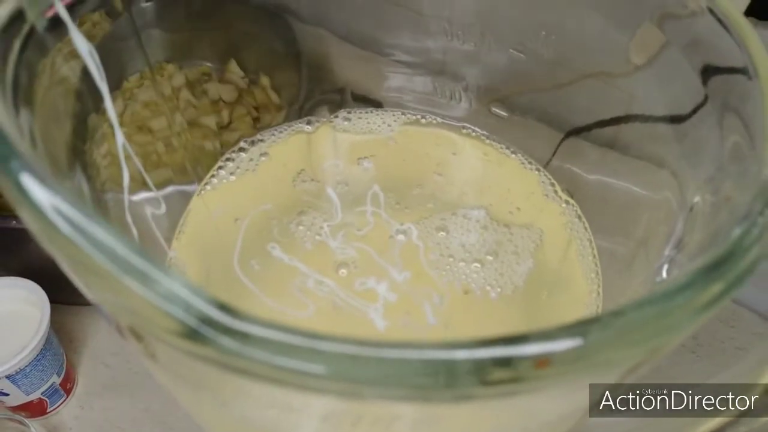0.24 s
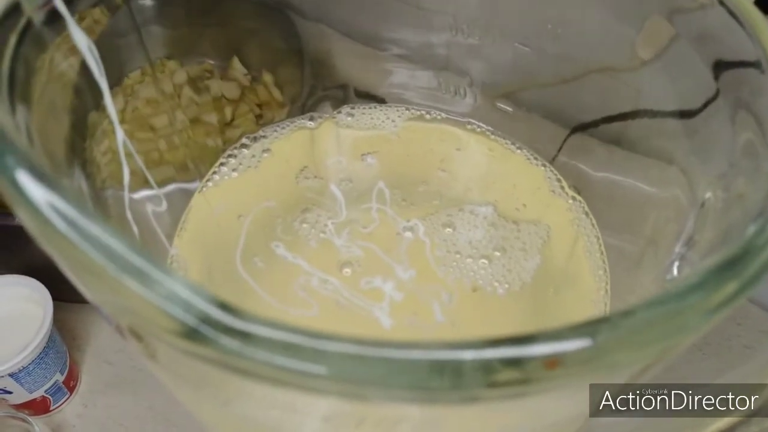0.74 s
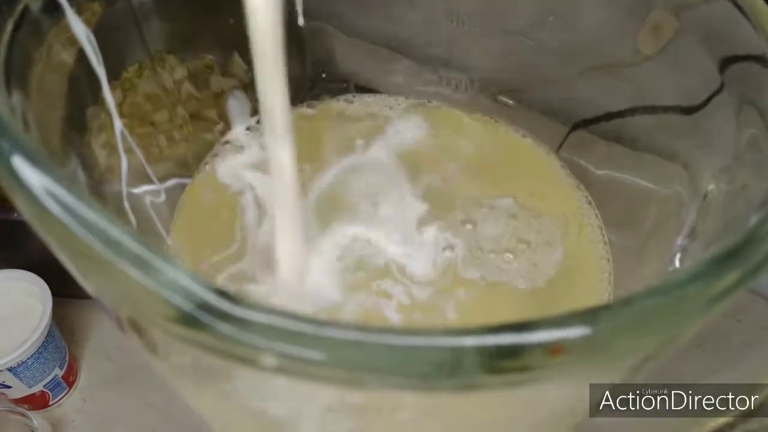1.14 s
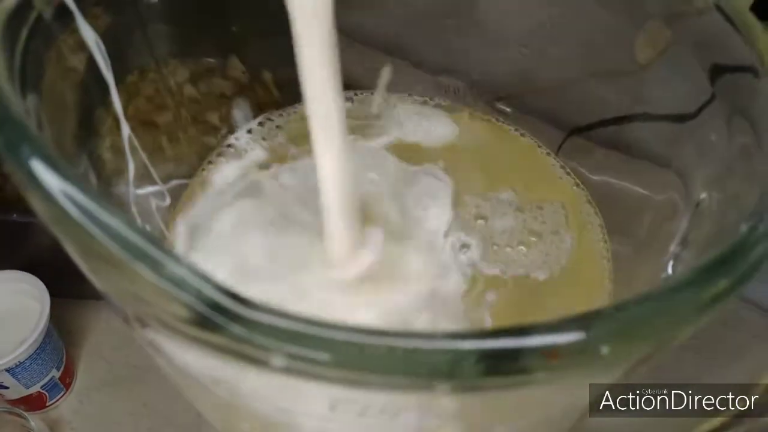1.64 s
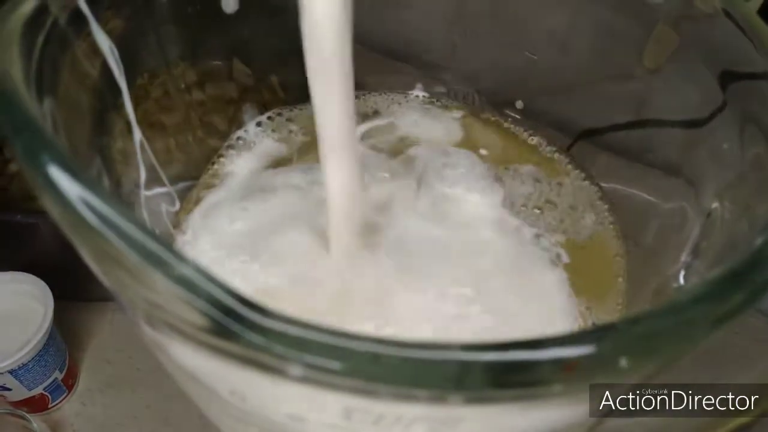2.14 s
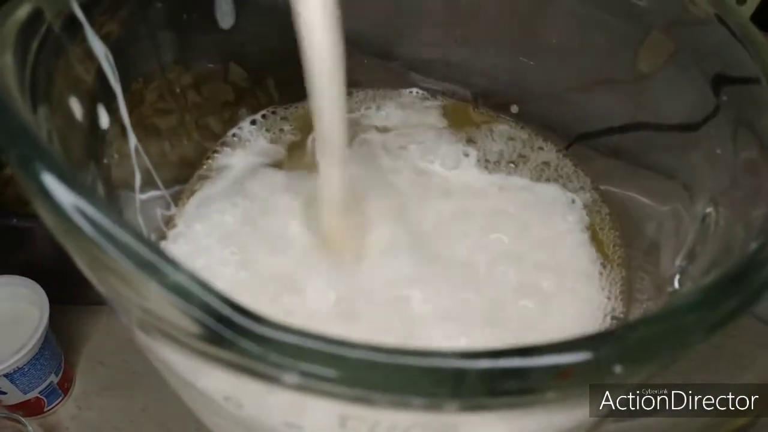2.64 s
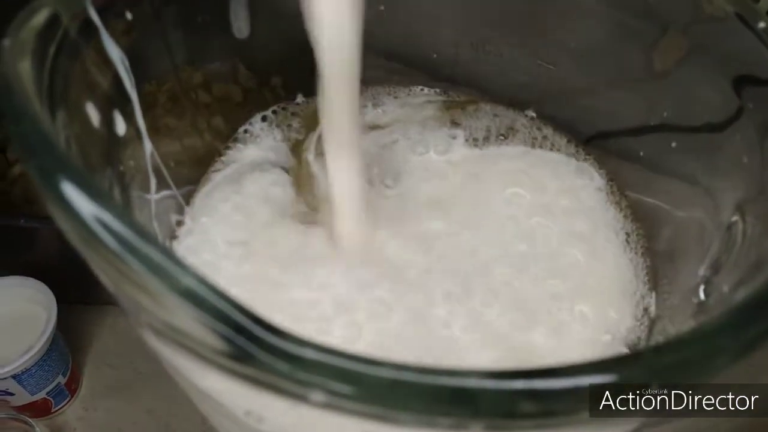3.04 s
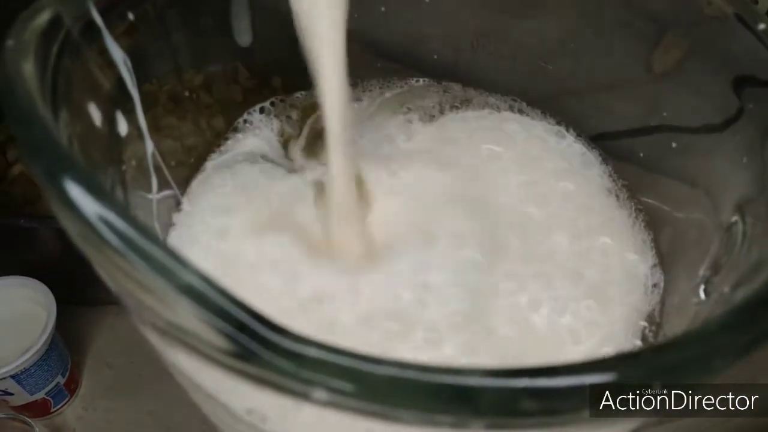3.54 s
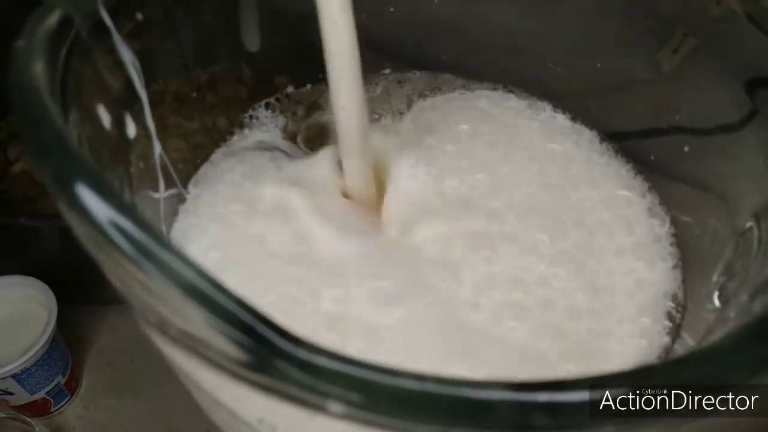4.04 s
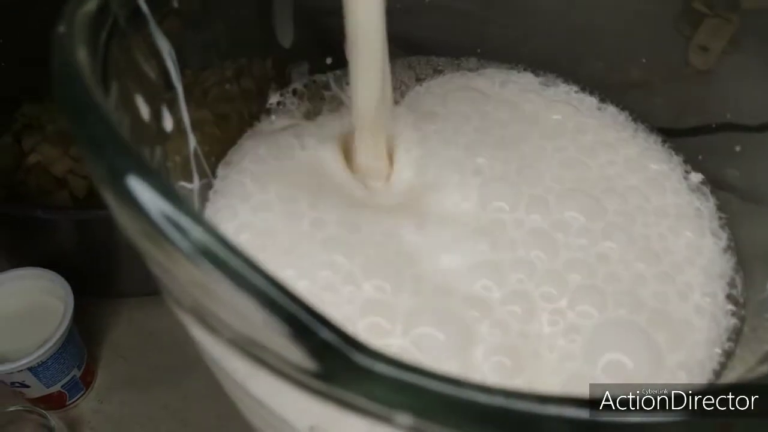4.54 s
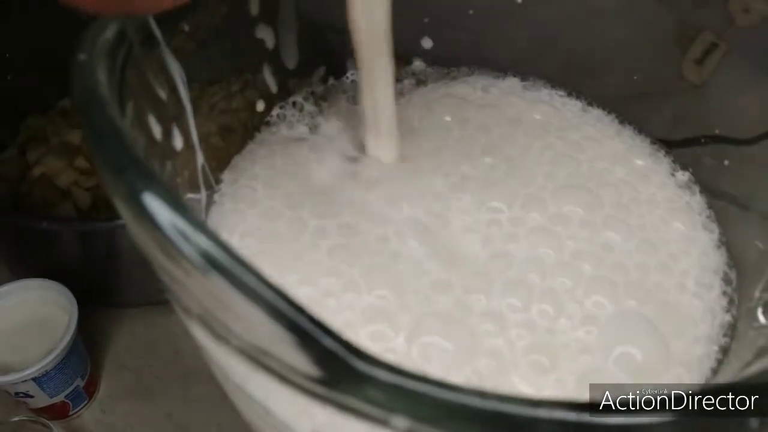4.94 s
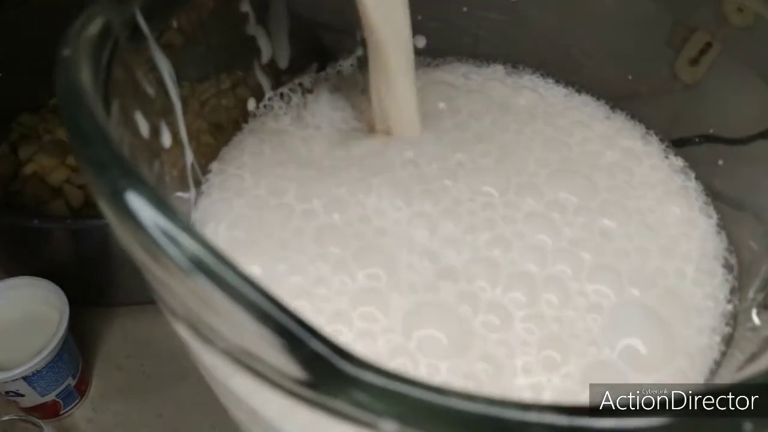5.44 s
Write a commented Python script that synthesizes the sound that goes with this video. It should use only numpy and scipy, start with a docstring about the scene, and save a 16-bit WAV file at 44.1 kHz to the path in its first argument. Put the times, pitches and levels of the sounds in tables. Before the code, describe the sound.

The first 0.9 seconds are nearly silent: faint kitchen noise and a very low rumble, with one quiet, short glass chime at about 0.5 seconds. At 0.9 to 1 second a stream of milk strikes liquid in a glass jar, and the rumble rises with it. Irregular splats follow, around fifteen a second, each with a crisp spray snap, wet splash and hollow knock of the jar's air. From 1.6 to 2 seconds deep gulps and bright bubble chirps stand out; between 2.2 and 4 seconds the slaps are sharpest, with hollow bloops near 2.5, soft low thumps and quick rising swoops. Froth fizzes and crackles in ragged surges, dipping briefly near 4.5 and flaring around 4.7. After 4.9 seconds the pour weakens into sparse, duller splats and small bubbles, nearly gone by 5.6. Pickup is close and stereo, with tight jar reflections and a faint kitchen tail.

```python
"""Over faint kitchen noise and a low rumble, a glass jar is touched and chimes once, as a sum of decaying modes.
Then milk is poured into the liquid in the jar, close to the microphones, and the rumble swells with it.
Its stream slaps the surface in quick splats: noise bursts that throw spray and knock the resonant air.
Trapped bubbles ring upward in pitch, froth churns and fizzes, heavy plunges thump and craters swoop shut.
The jar's walls answer at once and the kitchen faintly, as diffuse decaying reflections."""
import sys
import numpy as np
from scipy import signal
from scipy.fft import rfft, irfft, next_fast_len
from scipy.io import wavfile
from scipy.ndimage import uniform_filter1d, map_coordinates

SR = 44100
rng = np.random.default_rng(int(sys.argv[2]) if len(sys.argv) > 2 else 0)


def waveform_to_disk(signal):
    """Save audio, clipped to [-1, 1], as 16-bit WAV at the path in sys.argv[1]."""
    frames = np.transpose(np.atleast_2d(signal))
    scaled = np.clip(frames, -1, 1) * 32767
    samples = np.round(scaled).astype(np.int16)
    wavfile.write(sys.argv[1], SR, samples)


N = 250047
TOP_HZ = 16400  # upper limit of the audible band here

# Spectrum of spray and foam: (frequency [Hz], relative level [dB])
SPRAY_SPECTRUM = [(300, -44), (1000, 11.5), (1700, 5), (2300, -9), (3100, 6), (3400, 10.5), (3680, 16),
                  (3900, 2), (4200, 10.5), (5200, -1), (7200, 6.5), (9500, -2), (11500, 7), (15000, -10.5),
                  (16300, -40.5)]
# Main slaps of the stream on the surface:
# (time [s], relative treble snap [dB], relative knock of the air [dB], relative splash [dB])
STREAM_SLAPS = [(0.9101, -43.5, -61, -70), (0.9869, -16, -32.5, -29.5), (1.084, -25, -23.5, -33.5),
                (1.175, -49, -47, -40.5), (1.2136, -29, -31, -35.5), (1.236, -35, -35, -44),
                (1.2678, -45, -56, -34.5), (1.2921, -36.5, -56, -33), (1.3558, -37, -27.5, -39.5),
                (1.456, -17.5, -35.5, -29), (1.5, -52, -32, -32), (1.546, -27.5, -49, -45.5),
                (1.5976, -29, -24.5, -39), (1.6503, -16, -24.5, -31), (1.698, -20, -26.5, -41),
                (1.7823, -31, -26, -37.5), (1.8214, -29, -21, -39.5), (1.8926, -29.5, -20.5, -23),
                (1.968, -28.5, -45, -38.5), (2.0446, -25, -32.5, -38), (2.113, -42, -37.5, -41),
                (2.1441, -25, -56, -32.5), (2.1965, -12.5, -30, -36), (2.286, -31, -31, -33.5),
                (2.369, -29, -24.5, -30), (2.4612, -28.5, -26.5, -34.5), (2.5063, -40, -21.5, -25.5),
                (2.6253, -28, -33, -35), (2.715, -8, -32, -24.5), (2.7511, -25, -58, -32.5),
                (2.7836, -15.5, -23.5, -34.5), (2.8265, -34, -22.5, -45), (2.8619, -33, -36, -32.5),
                (2.9225, -16, -45, -34.5), (2.9606, -29, -31.5, -32), (3.0001, -44, -26.5, -44),
                (3.041, -24, -30.5, -30.5), (3.174, -48.5, -32, -54.5), (3.2239, -13.5, -55, -27.5),
                (3.268, -15, -32.5, -25), (3.3459, -11, -41, -32.5), (3.3945, -25.5, -33.5, -30.5),
                (3.467, -39, -27, -45), (3.4927, -30, -52, -38), (3.5203, -13.5, -20.5, -28),
                (3.5959, -26.5, -42, -37.5), (3.6523, -26.5, -39, -37.5), (3.6782, -42, -31.5, -42),
                (3.7212, -41, -34.5, -50), (3.7716, -17.5, -36, -31.5), (3.846, -31, -45, -49.5),
                (3.9001, -19.5, -27.5, -31), (3.9692, -25, -54, -41), (4.0447, -21.5, -29.5, -41),
                (4.1068, -26.5, -26.5, -45.5), (4.1413, -25, -30, -42), (4.1658, -32.5, -29.5, -49),
                (4.3011, -21, -25.5, -48), (4.3419, -31.5, -28, -50.5), (4.405, -27.5, -32.5, -32),
                (4.4383, -42, -27.5, -39.5), (4.533, -48, -38.5, -57.5), (4.603, -25, -22, -36.5),
                (4.643, -30.5, -50, -45), (4.6847, -25, -20, -45), (4.7404, -30, -58, -41),
                (4.8038, -31.5, -44.5, -33), (4.8265, -27.5, -36.5, -48.5), (4.8825, -35.5, -48, -42.5),
                (4.9722, -29, -25.5, -41.5), (5.0121, -29.5, -39.5, -54), (5.1334, -41, -34.5, -56),
                (5.2107, -37, -29, -52.5), (5.227, -45, -35, -54.5), (5.2846, -45, -36, -65),
                (5.302, -60, -41, -42.5), (5.3877, -38, -35.5, -54), (5.4134, -31.5, -41.5, -51.5),
                (5.5354, -78, -37.5, -59.5)]


def amp(db):
    """Convert decibels to a pressure ratio, 20 dB to each factor of ten."""
    return 10 ** (np.asarray(db) / 20)


def unit(x):
    """Normalise the signal power: scale to rms 1."""
    return x / np.sqrt(np.mean(x ** 2) + 1e-20)


def along(points, hz):
    """Interpolate (Hz, value) points on a logarithmic frequency axis."""
    f, v = np.transpose(points)
    return np.interp(np.log(hz + 1), np.log(f + 1), v)


def curves(rows):
    """Interpolate each column after the time linearly, one value per sample."""
    s, *cols = np.transpose(rows)
    return [np.interp(np.arange(N) / SR, s, c) for c in cols]


def seconds(length):
    """Sample a time axis [s] uniformly."""
    return np.arange(int(length * SR)) / SR


def add(track, s, sound):
    """Superpose a sound on a track, starting at time s."""
    part = track[..., max(0, round(s * SR)):][..., :sound.shape[-1]]
    part += sound[..., :part.shape[-1]]


def filtered(x, response):
    """Linear filtering: multiply the spectrum of x by a response of frequency."""
    n = x.shape[-1]
    m = next_fast_len(n + 4096)  # padding keeps the filter's ringing from wrapping round
    return irfft(rfft(x, m) * response(np.fft.rfftfreq(m, 1 / SR)), m)[..., :n]


def noise(colour, channels=1):
    """Spectral shaping of white noise into coloured noise of rms 1."""
    white = rng.standard_normal((channels, N))
    return unit(filtered(white, lambda hz: amp(along(colour, hz))))


def wobble(rate):
    """Slow random modulation: a smooth spline through `rate` random knots a second."""
    knots = rng.standard_normal(int(N * rate / SR) + 4)
    return map_coordinates(knots, [np.arange(N) * rate / SR])


def rumble(level_db=-2, side_db=-20, room_db=-57, lump_db=1.5):
    """Low-frequency noise, nearly alike at both ports, grows with the pour over the quiet kitchen."""
    # Course of the rumble: (time [s], relative level [dB])
    rumble_course = [(0.0, -45), (0.82, -49), (.92, -39), (4.01, -37.5), (4.11, -38.5), (4.37, -35.5),
                     (5.15, -43), (5.42, -39), (5.48, -47), (5.67, -54)]
    # Spectrum of the rumble: (frequency [Hz], relative level [dB])
    rumble_spectrum = [(12, -41.5), (20, 3.5), (31, -4), (42, 8), (52, -7.5), (68, 8), (97, -7),
                       (125, -3.5), (144, -11.5), (167, -34.5), (200, -26), (260, -25), (440, -120)]
    # Spectrum of the quiet kitchen: (frequency [Hz], relative level [dB])
    room_spectrum = [(20, 9), (70, 2), (150, -16.5), (300, -10), (600, -23.5), (1200, -30.5), (3000, -38.5),
                     (15000, -47)]
    in_phase = noise(rumble_spectrum)
    opposed = noise(rumble_spectrum) * [[1], [-1]]
    low = in_phase + amp(side_db) * opposed
    low = unit(low * amp(lump_db * wobble(17)))  # it comes in uneven lumps
    return amp(curves(rumble_course)[0] + level_db) * low + amp(room_db) * noise(room_spectrum)


def chime(s=.479, level_db=-2, ring_attack=0.0023, tap_db=-52, tap_life=0.065, tap_hz=860, tap_width_hz=300):
    """Modal vibration: a light tap, itself resonant noise, sets the glass ringing in decaying sines."""
    # Modes of the glass: (frequency [Hz], relative level [dB], time to fall 60 dB [s])
    glass_modes = [(818, -39, 0.078), (860, -46.5, 0.28), (1111, -47.5, 1.11), (1196, -49.5, 0.39),
                   (2794, -41.5, 0.25), (3340, -53, 0.1), (4820, -59, 0.091)]
    t, out = seconds(0.59), np.zeros(N)
    ring = sum(amp(db - 60 * t / t60) * np.sin(2 * np.pi * hz * t) for hz, db, t60 in glass_modes)
    ring = ring * (1 - np.exp(-t / ring_attack))

    def tap_response(hz):
        """A single damped resonance followed by a first-order loss of treble."""
        resonance = 1j * hz / (tap_hz ** 2 - hz ** 2 + 1j * tap_width_hz * hz)
        return resonance / (1 + 1j * hz / 3000)

    tap = unit(filtered(rng.standard_normal(len(t)), tap_response))
    add(out, s, amp(level_db) * ring + amp(tap_db) * tap * np.exp(-t / tap_life))
    return out


def echoes(x, t60, low_hz):
    """Diffuse reflection: exponential noise tails, independent at the two ports and weak below low_hz."""
    t, out, size = seconds(.4), np.zeros((2, N)), SR // 4
    for start in range(0, N, size):  # a new tail each quarter second, as the liquid moves
        tail = rng.standard_normal((2, len(t))) * amp(-60 * t / t60) * (1 - np.exp(-t / 0.00035))
        tail = filtered(tail / np.linalg.norm(tail[0]), lambda hz: (1j * hz / (low_hz + 1j * hz)) ** 2)
        add(out, start / SR, signal.fftconvolve(x[:, start:start + size], tail, axes=1))
    return out


def cavity(hz):
    """Cavity resonance: the damped modes of the air above the liquid, summed."""
    # Modes of the air in the jar: (frequency [Hz], bandwidth [Hz], relative level [dB])
    air_modes = [(419.7, 23.2, 31.5), (533, 150, 16.5), (730, 57.5, 25), (916, 40, 22.5)]
    return sum(amp(db) * 1j * hz * w / (c * c - hz * hz + 1j * hz * w) for c, w, db in air_modes)


def slap(t, snap_db, knock_db, splash_db, split_hz=6000, snap_life=0.0009, splash_life=0.0014,
         burst_db=3.0, spray_db=-14, spray_life=0.00071, mist_db=-33, mist_life=0.038,
         attack=0.00019, attack_spread=0.31, vary_db=4.0, sputter_db=3.5, width=0.76):
    """Impact on a liquid: a bright snap and duller splash of noise, with one impulse to the air in the jar."""
    # each slap bursts a pocket of its own shape, hence its own spectrum
    pocket = np.c_[np.geomspace(1000, 16000, 20), rng.normal(0, vary_db, 20)]
    # noise common to both ports, plus some of each port's own
    grit = rng.standard_normal(len(t)) + width * rng.standard_normal((2, len(t)))
    # a sputtering tail of spray and fine mist
    sputter = np.interp(t, np.linspace(0, t[-1], 70), rng.normal(0, sputter_db, 70))
    tail = amp(spray_db) * np.exp(-t / spray_life) + amp(mist_db) * np.exp(-t / mist_life)
    spray = amp(sputter) * tail
    softness = np.exp(attack_spread * rng.standard_normal())  # some slaps land flat, others tear open
    onset = (1 - np.exp(-t / (attack * softness))) ** 2

    def colour(hz):
        """Spectrum of the spray, modified by this pocket."""
        return amp(along(SPRAY_SPECTRUM, hz) + along(pocket, hz))

    def treble(hz):
        """Crossover: the share of the spectrum above the split."""
        return hz ** 6 / (hz ** 6 + split_hz ** 6)

    def burst(share, life):
        """Energy scaling: a band of grit is set to the rms of its short envelope."""
        envelope = (amp(burst_db) * np.exp(-t / life) + spray) * onset
        sound = filtered(grit, lambda hz: colour(hz) * share(hz)) * envelope
        return unit(sound) * np.sqrt(np.mean(envelope ** 2))

    knock = filtered(np.exp(-t / .0001), cavity)
    # sloshing shifts the cavity's pitch
    knock = np.interp(t * np.exp(rng.normal(0, 0.061)), t, knock / np.abs(knock).max())
    snap = burst(treble, snap_life)
    splash = burst(lambda hz: 1 - treble(hz), splash_life * softness)
    return amp(snap_db) * snap + amp(splash_db) * splash + amp(knock_db) * knock


def splats(snap_db=-5, knock_db=4.0, splash_db=3.0, delay=.0006):
    """Repeated impact: the main slaps of the stream on the surface, superposed."""
    t, out = seconds(.09), np.zeros((2, N))
    for s, snap, knock, splash in STREAM_SLAPS:
        add(out, s + delay, slap(t, snap + snap_db, knock + knock_db, splash + splash_db))
    return out


def swoop(start_hz, end_hz, length, flutter=0.56, size=22):
    """Shrinking resonator: a hollow's period falls linearly, so its pitch climbs ever faster."""
    u = seconds(length) / length
    hz = 1 / ((1 - u) / start_hz + u / end_hz)
    # the falling milk drives it unevenly, in strength and phase
    knots = rng.standard_normal(size) + 1j * rng.standard_normal(size)
    drive = 1 + flutter * np.interp(u, np.linspace(0, 1, size), knots)
    envelope = np.sqrt(np.sin(np.pi * u) * start_hz / hz)
    return envelope * np.imag(drive * np.exp(2j * np.pi * np.cumsum(hz) / SR))


def trapped(level_db=-13, centre_hz=620, spread=0.25, climb=1.6, length=.065, fade=0.041):
    """Entrained air: each slap traps a lesser pocket that glides up, louder for a harder knock."""
    out = np.zeros(N)
    variations = np.exp(spread * rng.standard_normal((len(STREAM_SLAPS), 2)))
    for (s, _, knock, _), (size, pace) in zip(STREAM_SLAPS, variations):
        glide = swoop(centre_hz * size, centre_hz * size * climb, length * pace)
        add(out, s, amp(knock + level_db) * glide * np.exp(-seconds(length * pace) / fade))
    return out


def lifetime(hz):
    """Bubble damping: the decay time [s] shortens as a power of pitch, from 5.2 ms at 1 kHz."""
    return 0.0052 * (hz / 1000) ** -0.92


def bubble(t, hz, life, rise, rough=0.034):
    """Bubble resonance: it swells, rings and sharpens as it nears the surface."""
    # the churning milk jostles its pitch
    jostle = np.interp(t, np.linspace(0, t[-1], 60), rng.standard_normal(60))
    phase = 2 * np.pi * np.cumsum(hz * (1 + rise * t + rough * jostle)) / SR
    return (1 - np.exp(-2 * t / life)) * np.exp(-t / life) * np.sin(phase)


def crackle(level_db=-5, count=42, centre_hz=3600, spread=0.72, wait=.024, fade_db=6.5, vary_db=4, rise=15):
    """Random arrival: every splash leaves a shower of tiny bubbles, which thins out and fades."""
    t, out = seconds(.015), np.zeros((2, N))
    for s, _, _, splash in STREAM_SLAPS:
        lateness = rng.exponential(size=count)  # in units of the mean wait [s]
        for late, (size, strength, place) in zip(lateness, rng.standard_normal((count, 3))):
            hz = min(centre_hz * np.exp(spread * size), TOP_HZ)
            level = splash + level_db - fade_db * late + vary_db * strength
            ring = amp(level) * bubble(t, hz, lifetime(hz) / 2, rise)
            add(out, s + wait * late, ring * (1 + 0.26 * place * np.array([[1], [-1]])))
    return out


def swarm(count, centre_hz, spread, cycles, rise):
    """Incoherent superposition: many short-lived bubbles of random size and strength, rms 1."""
    t, out = seconds(min(.04, 40 / centre_hz)), np.zeros(N)
    for when, size, strength, speed in rng.random((count, 4)):
        hz = centre_hz * 2 ** (spread * (2 * size - 1))  # spread in octaves either way
        life = cycles / hz * (.5 + speed)
        add(out, when * N / SR, amp(20 * strength ** 2) * bubble(t, hz, life, rise * speed / life))
    return unit(out)


def droplets(count, life):
    """Impulsive noise: stray droplets tick on the foam and the glass in decaying bursts, rms 1."""
    hits = np.zeros(N)
    hits[rng.integers(0, N, count)] = amp(20 * rng.random(count) ** 2)
    envelope = signal.lfilter([1], [1, -np.exp(-1 / (life * SR))], hits)
    return unit(envelope * noise(SPRAY_SPECTRUM)[0])


def slap_envelope(settle, base, dip_s=0.016, dip_db=-8):
    """Amplitude modulation: the level dips briefly before each slap, jumps at it and settles."""
    t, jumps, dip = seconds(.3), np.zeros(N), np.zeros(N)
    for s, _, _, splash in STREAM_SLAPS:
        add(jumps, s, amp(splash / 2) * np.exp(-t / settle))
        add(dip, s - dip_s, seconds(dip_s) / dip_s)
    return (base + (1 - base) * unit(jumps)) * amp(dip_db * dip)


def froth(churn_db=-7, hollow_db=-4, gulp_db=-5, small_db=-3, fizz_db=-13, tiny_db=-4, tick_db=-7, surge_db=3.0):
    """Turbulent aeration: the milk churns and gulps, small bubbles blip and foam fizzes in ragged surges."""
    # Course of the pour: (time [s], relative churn level [dB], relative fizz level [dB])
    pour_course = [(0.9, -73, -62), (0.98, -60.5, -53), (1.09, -47, -58), (1.16, -45.5, -57),
                   (1.47, -45.5, -48.5), (1.76, -38, -56), (2.31, -48.5, -53), (2.53, -41.5, -54),
                   (2.8, -45.5, -52.5), (3.1, -47, -57), (3.54, -43, -56.5), (3.92, -48, -54.5),
                   (4.44, -47.5, -49.5), (4.53, -61, -73), (4.68, -47.5, -43.5), (4.87, -46.5, -62),
                   (5.56, -68.5, -96), (5.67, -57, -104)]
    # Spectrum of the churning: (frequency [Hz], relative level [dB])
    churn_spectrum = [(120, -7.5), (250, 6), (410, 8.5), (550, -17), (740, -2), (1100, -10.5),
                      (1700, -36.5), (3000, -38.5), (6000, -55)]
    churn_level, fizz_level = curves(pour_course)
    start_s, rise_s = 0.93, 0.015  # the stream arrives and reaches full flow
    flow = np.clip((np.arange(N) / SR - start_s) / rise_s, 0, 1)

    gulps = swarm(count=300, centre_hz=561.4, spread=0.75, cycles=4.83, rise=0.061)
    blips = swarm(count=600, centre_hz=1180, spread=0.773, cycles=5.3, rise=0.14)
    beads = swarm(count=2600, centre_hz=3022, spread=0.814, cycles=3.5, rise=0.065)
    ticks = droplets(count=260, life=0.00068)
    hollow = unit(filtered(rng.standard_normal(N), cavity))  # the churning keeps the air in the jar sounding

    body = amp(churn_db) * noise(churn_spectrum) + amp(hollow_db) * hollow
    body = body + amp(gulp_db) * gulps + amp(small_db) * blips
    foam = amp(fizz_db) * noise(SPRAY_SPECTRUM, channels=2) + amp(tiny_db) * beads + amp(tick_db) * ticks
    body = amp(churn_level) * slap_envelope(settle=0.0087, base=0.73) * body
    surging = amp(fizz_level + surge_db * wobble(24.68))
    foam = surging * slap_envelope(settle=0.014, base=0.72) * foam
    return flow * (body + foam)


def gurgles(level_db=0, rise=6.5):
    """Bubble resonance: loud single bubbles dragged under by the stream; small ones climb faster in pitch."""
    # The loudest single bubbles: (time [s], starting pitch [Hz], relative level [dB])
    loud_bubbles = [(0.953, 3180, -33), (.959, 1820, -33), (0.986, 600, -23.5), (1.175, 4200, -26),
                    (1.178, 967, -25), (1.352, 1147, -23), (1.39, 4180, -21.5), (1.595, 286, -19.5),
                    (1.649, 295, -21), (1.7, 282, -21.5), (1.739, 693, -24), (1.785, 343, -17.5),
                    (1.804, 3510, -12), (1.807, 2610, -14), (1.817, 395, -15), (1.838, 455, -21.5),
                    (1.89, 443, -24.5), (1.905, 553, -23.5), (2.344, 3600, -21), (2.407, 797, -24),
                    (2.508, 692, -11.5), (2.559, 726, -15), (2.691, 3060, -23.5), (2.791, 699, -17),
                    (2.803, 740, -19.5), (2.972, 3680, -23), (3.217, 1410, -28.5), (3.239, 3170, -14.5),
                    (3.365, 1670, -30), (3.394, 1336, -16.5), (3.495, 2750, -25), (3.68, 4800, -22),
                    (4.079, 2994, -18.5), (4.136, 524, -26), (4.309, 772, -25.5), (4.373, 723, -24),
                    (4.388, 2800, -20), (4.407, 1160, -21.5), (4.438, 927, -18), (4.609, 425, -23),
                    (4.692, 394, -19.5), (4.74, 990, -22.5), (4.74, 1460, -19), (4.803, 3000, -23),
                    (4.889, 1240, -14.5), (4.899, 1450, -18), (5.19, 3020, -30.5)]
    t, out = seconds(.09), np.zeros(N)
    for s, hz, db in loud_bubbles:
        add(out, s, amp(db + level_db) * bubble(t, hz, lifetime(hz), rise * np.sqrt(hz / 1000)))
    return out


def thumps(level_db=0, swell=0.01):
    """Damped oscillation: a heavy plunge shakes the jar in a brief low pulse."""
    # Heavy plunges of the stream: (time [s], frequency [Hz], relative level [dB])
    plunges = [(1.084, 93, -29.5), (2.119, 46, -27), (2.501, 75, -28), (2.649, 73, -26.5),
               (2.985, 70.4, -30), (3.274, 63, -26), (3.368, 55, -26), (3.404, 64.5, -27),
               (3.485, 61.4, -32.5), (3.786, 60.4, -26.5), (4.547, 61.3, -29), (5.395, 106, -33)]
    t, out = seconds(.08), np.zeros(N)
    envelope = (t / swell * np.exp(1 - t / swell)) ** 2
    for s, hz, db in plunges:
        add(out, s, amp(db + level_db) * envelope * np.sin(2 * np.pi * (hz * t + rng.random())))
    return out


def runs(level_db=-2, count=12, scatter=0.14, vary_db=3, rise=12):
    """Fragmentation: a torn pocket of air sheds ever smaller bubbles, so their pitches tend upward."""
    # Pockets tearing into bubbles:
    # (time [s], first nominal pitch [Hz], last nominal pitch [Hz], length [s], relative level [dB])
    torn_pockets = [(1.211, 2670, 4200, 0.025, -36), (1.265, 2200, 3880, 0.011, -29),
                    (1.296, 915, 3830, 0.032, -36), (1.662, 1050, 2580, 0.023, -39),
                    (1.801, 1090, 2500, 0.011, -31), (1.98, 1260, 2340, 0.021, -29.5),
                    (2.323, 1410, 3120, 0.039, -28.5), (2.647, 1680, 3520, 0.036, -34.5),
                    (3.212, 1770, 4100, 0.033, -32), (4.086, 1250, 2530, 0.031, -31.5),
                    (4.371, 1810, 3300, 0.044, -32)]
    t, out = seconds(.03), np.zeros((2, N))
    for s, first_hz, last_hz, length, db in torn_pockets:
        for k, (late, size, strength, place) in enumerate(rng.standard_normal((count, 4))):
            u = (k + 0.34 * late) / count
            hz = first_hz * (last_hz / first_hz) ** u * np.exp(scatter * size)
            ring = amp(db + level_db + vary_db * strength) * bubble(t, hz, lifetime(hz) / 2, rise)
            # each bubble lies at its own place between the ports
            add(out, s + u * length, ring * (1 + 0.24 * place * np.array([[1], [-1]])))
    return out


def swoops(level_db=1):
    """Shrinking resonators: big craters left by the stream close up with a rising swoop."""
    # Closing craters: (time [s], final pitch [Hz], length [s], relative level [dB])
    craters = [(1.835, 1710, 0.042, -43.5), (1.929, 2160, 0.057, -49), (2.053, 1330, 0.084, -44),
               (2.572, 1800, 0.026, -31.5), (2.921, 1230, 0.031, -40.5), (3.188, 1050, 0.037, -41.5),
               (3.354, 1170, 0.036, -41.5), (3.526, 1670, 0.042, -40), (3.706, 1060, 0.036, -43.5),
               (3.759, 1940, 0.043, -43.5), (4.361, 3080, 0.045, -34), (4.681, 1806, 0.088, -42.5),
               (4.884, 1750, .028, -34.5), (4.976, 1112, 0.063, -41), (5.172, 1170, 0.029, -38),
               (5.207, 1860, 0.025, -31.5)]
    crater_hz = 700  # every crater opens to about the same size, so every swoop starts here
    out = np.zeros(N)
    for s, end_hz, length, db in craters:
        add(out, s, amp(db + level_db) * swoop(crater_hz, end_hz, length))
    return out


def scene(jar_db=-1, kitchen_db=-18, dull_hz=6000):
    """Propagation: the milk reaches the right port first, reflections follow, and each port has its colour."""
    # Delay of the left port behind the right: (frequency [Hz], delay [s])
    port_delay = [(300, 0.00012), (750, 0.00028), (1300, 0.000073), (1900, 0.00022), (4000, 0.0002)]
    # Response of the two ports: (frequency [Hz], left level [dB], right level [dB])
    port_response = [(101.3, -0.5, 15), (282, -6.5, -2.5), (650, 3.5, 7), (1336, -4.5, -3.5),
                     (2906, 4.5, 3), (3430, -4, 2), (5640, 1, -3.5), (6700, 2.5, -4), (7770, 5, -4.5),
                     (10770, -18, 2.5), (12070, -22.5, -9.5), (15000, -9.5, -8)]
    ports = np.array(port_response)
    left, right = ports[:, :2], ports[:, ::2]

    milk = splats() + gurgles() + trapped() + swoops() + runs() + crackle() + froth()
    glass = chime()  # the wall radiates outward, broadside to both ports
    sides = np.array([[-1], [1]])  # half of the delay to each port, in opposite senses
    direct = filtered(milk, lambda hz: np.exp(1j * np.pi * hz * along(port_delay, hz) * sides))
    jar = echoes(milk, t60=0.042, low_hz=870)
    kitchen = echoes(milk + glass, t60=0.39, low_hz=245)
    kitchen = filtered(kitchen, lambda hz: 1 / (1 + 1j * hz / dull_hz))
    wet = amp(jar_db) * jar + amp(kitchen_db) * kitchen
    heard = filtered(direct + glass + wet, lambda hz: amp([along(left, hz), along(right, hz)]))
    return heard + thumps() + rumble()


def gate(band, threshold_db=-70, depth_db=10):
    """Downward gating: turn a band down smoothly once its short-time level sinks under the threshold."""
    power = uniform_filter1d(np.mean(band ** 2, axis=0), size=700)  # averaged over 16 ms
    level = 10 * np.log10(np.abs(power) + 1e-20)
    return band * amp(-depth_db * (1 + np.tanh(threshold_db - level)) / 2)


def record(dry):
    """Band-split gating: quieten faint middle and treble sound, and keep nothing above the band limit."""
    low_hz, split_hz = 965, 1900  # lower edges of the middle band and of the treble
    upper, treble = [filtered(dry, lambda hz: 1 - 1 / (1 + (hz / edge) ** 10)) for edge in (low_hz, split_hz)]
    bass, middle = dry - upper, upper - treble
    return filtered(bass + gate(middle) + gate(treble), lambda hz: hz < TOP_HZ)


dry = scene()
out = record(dry)
waveform_to_disk(out)
```